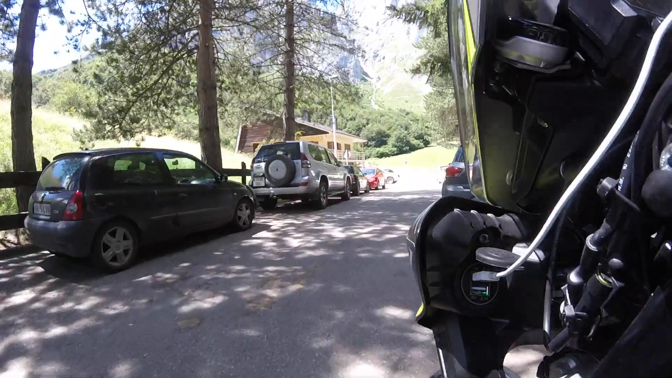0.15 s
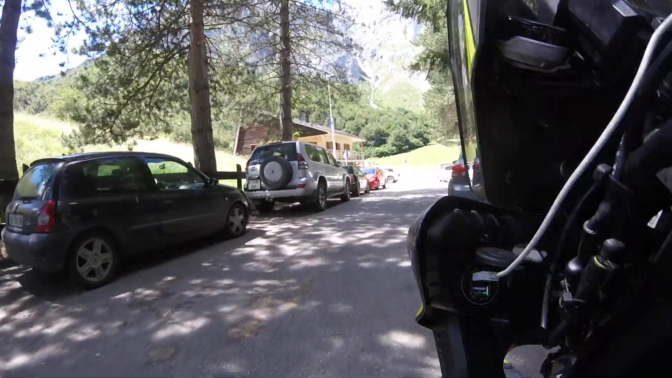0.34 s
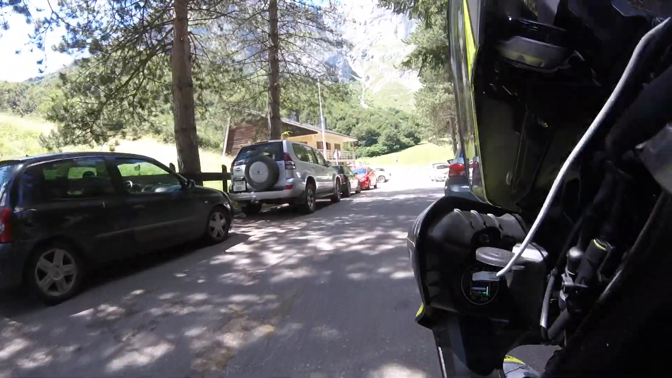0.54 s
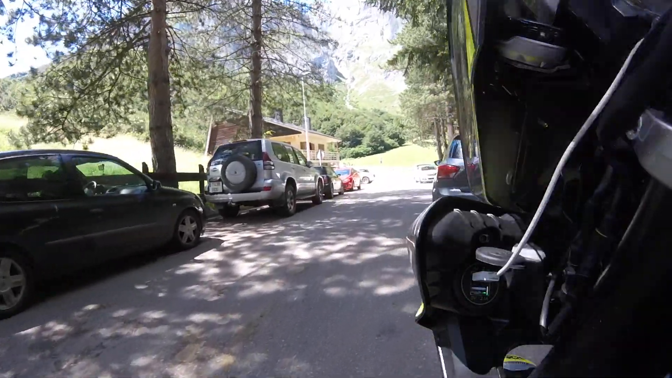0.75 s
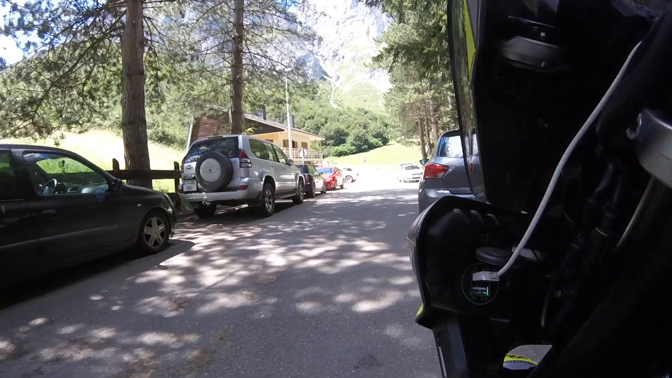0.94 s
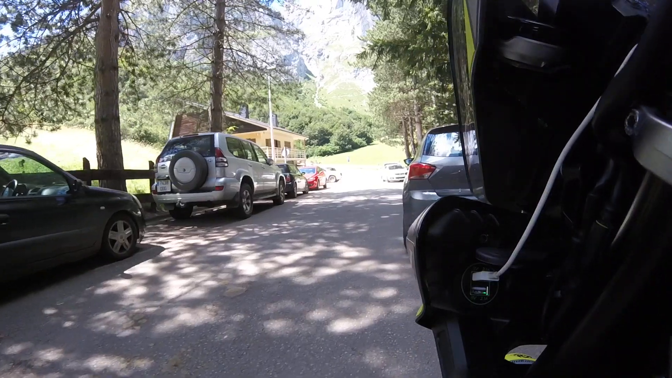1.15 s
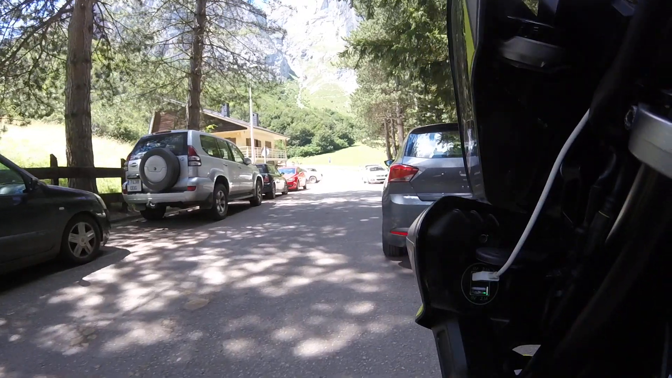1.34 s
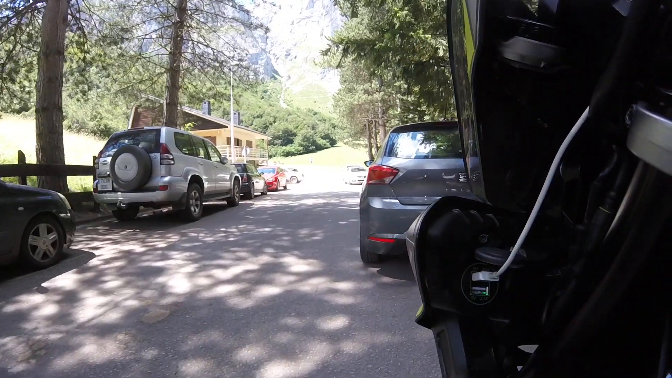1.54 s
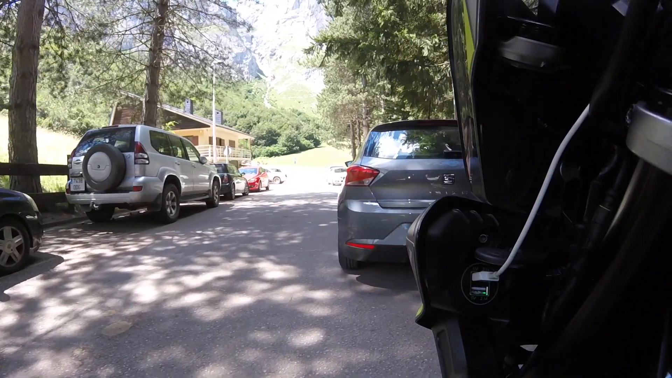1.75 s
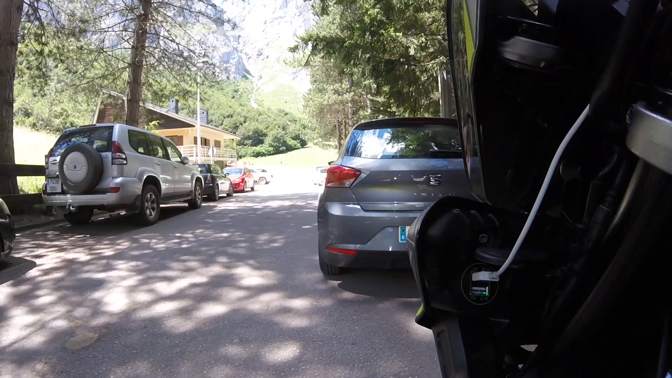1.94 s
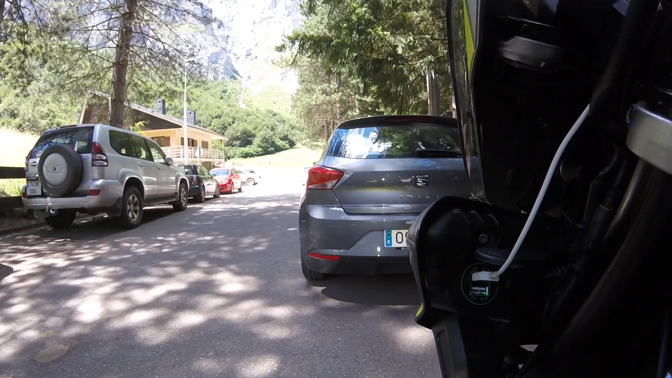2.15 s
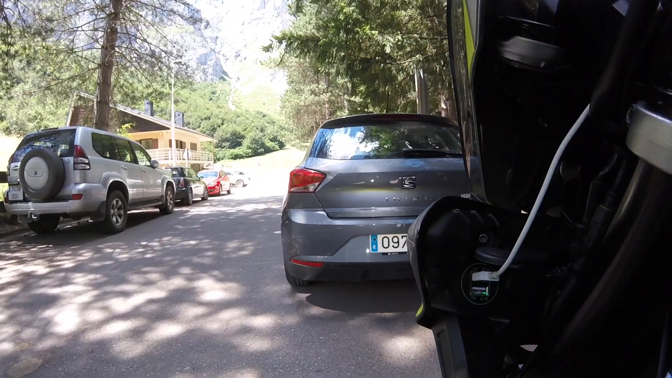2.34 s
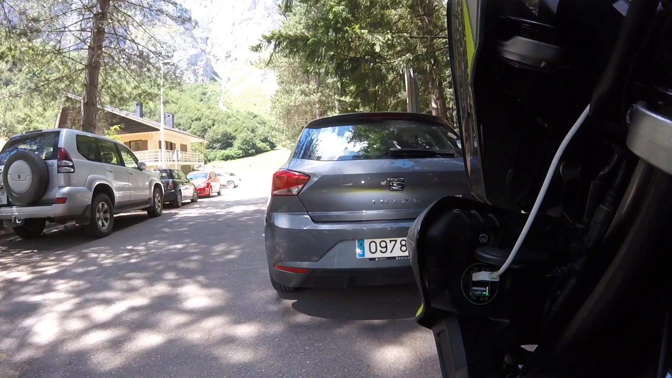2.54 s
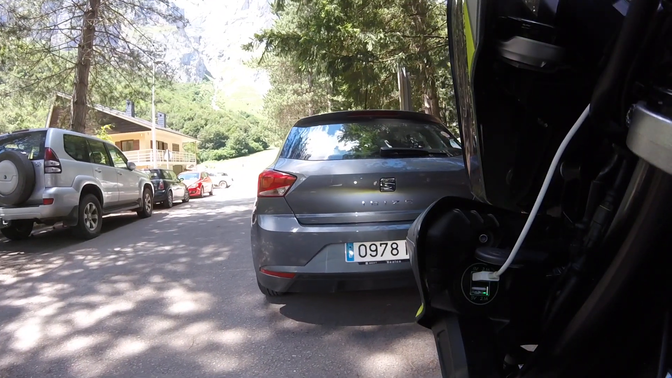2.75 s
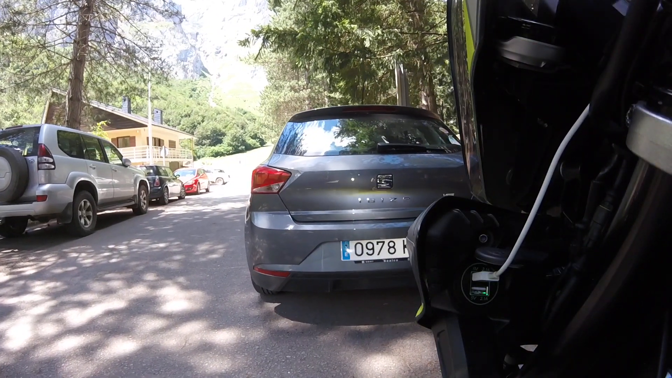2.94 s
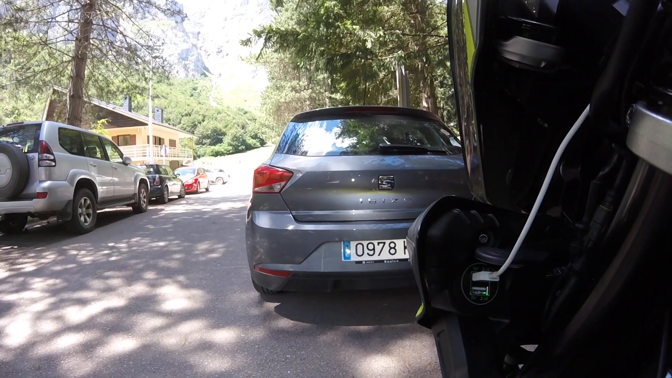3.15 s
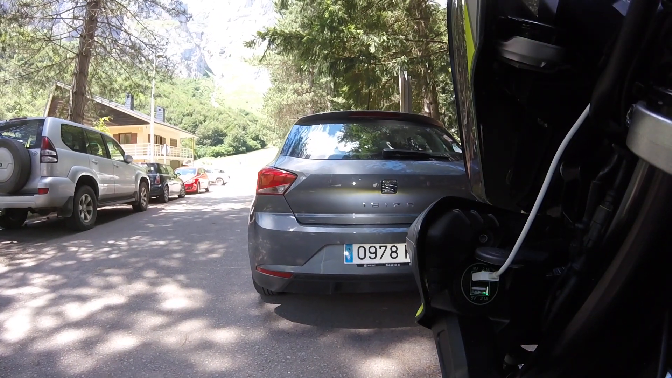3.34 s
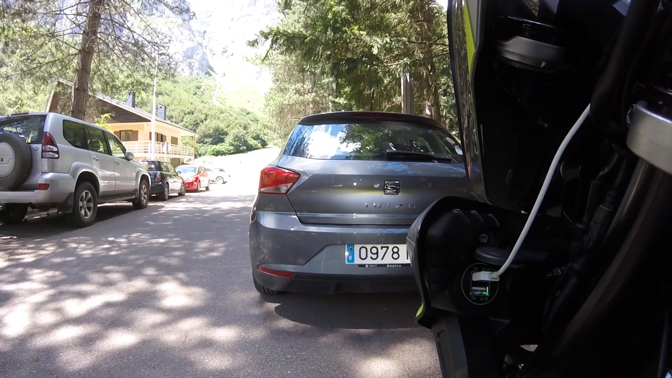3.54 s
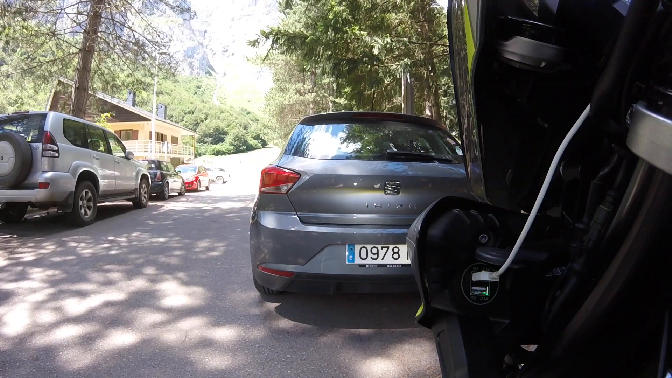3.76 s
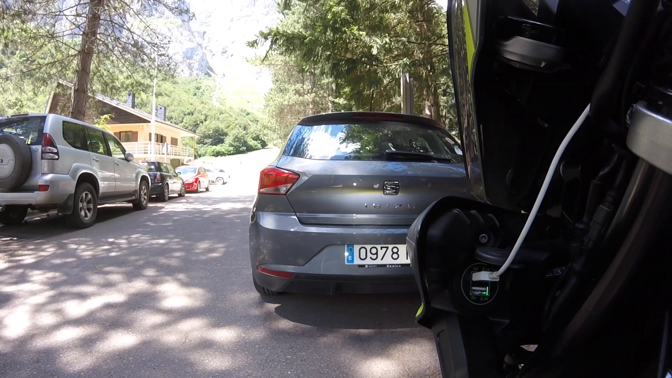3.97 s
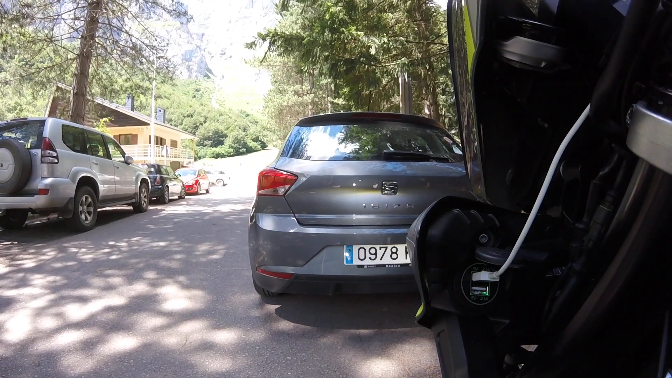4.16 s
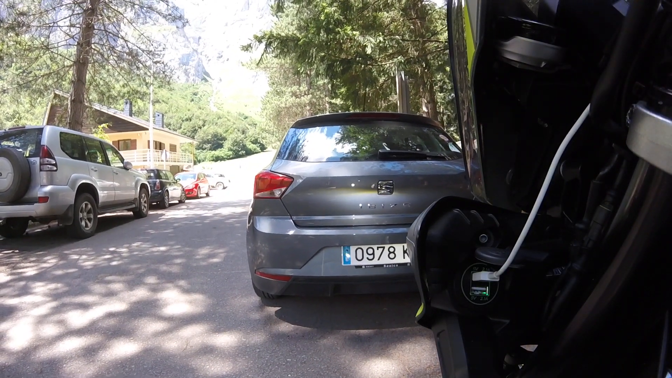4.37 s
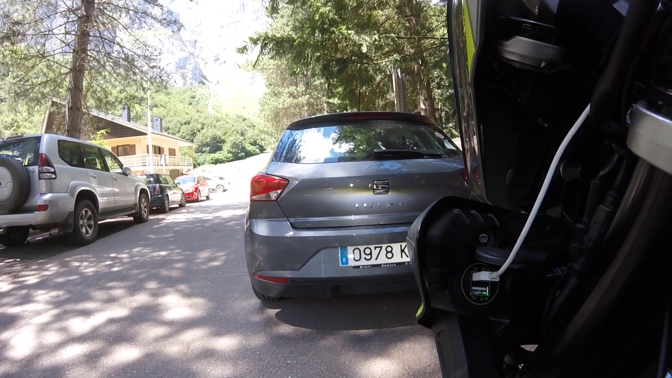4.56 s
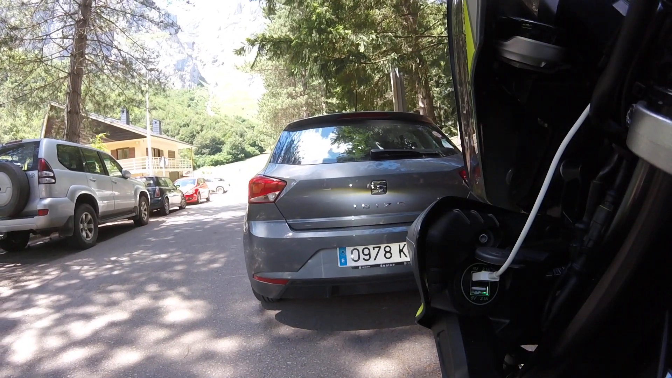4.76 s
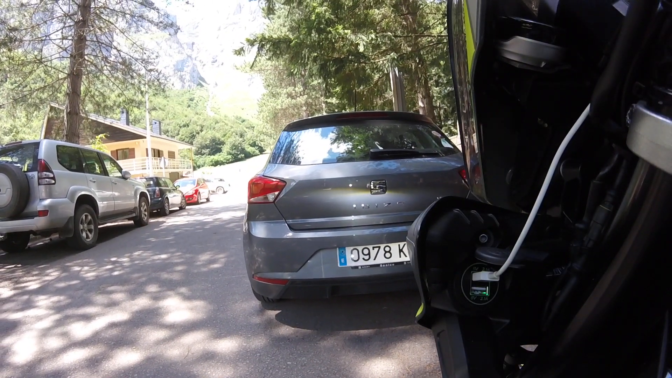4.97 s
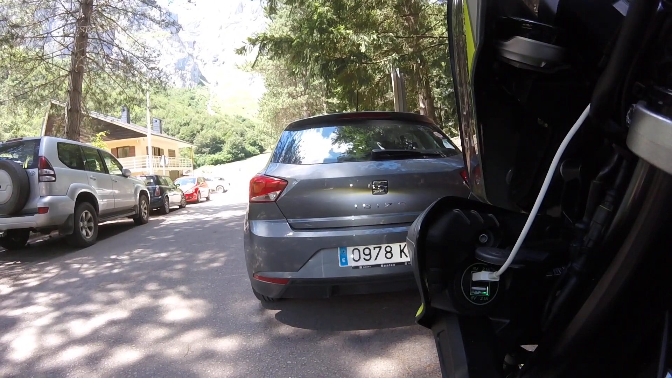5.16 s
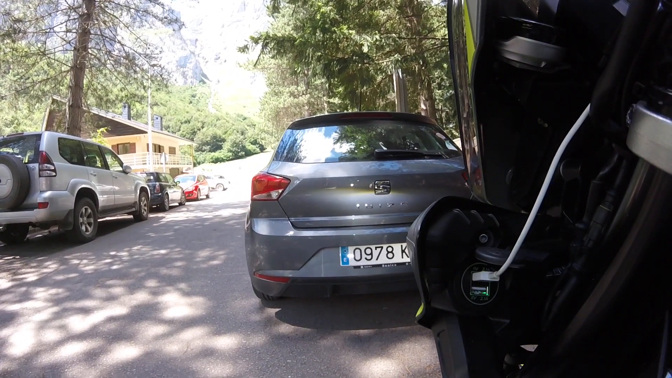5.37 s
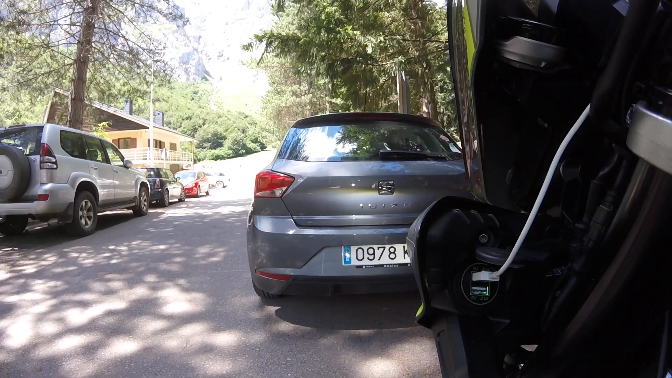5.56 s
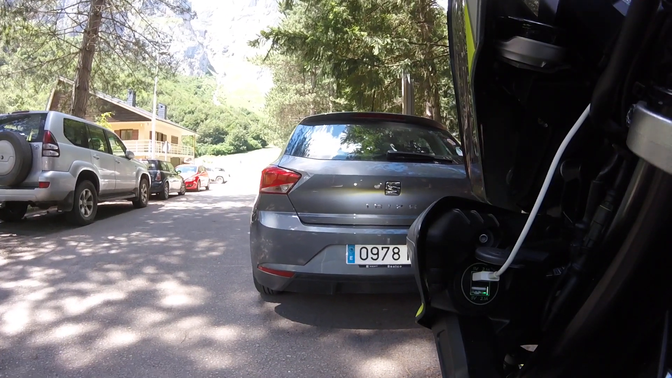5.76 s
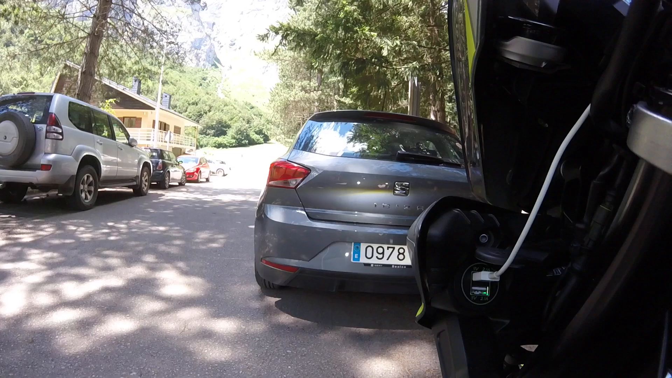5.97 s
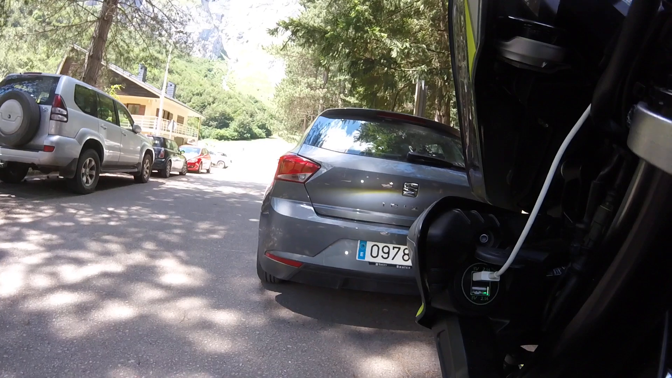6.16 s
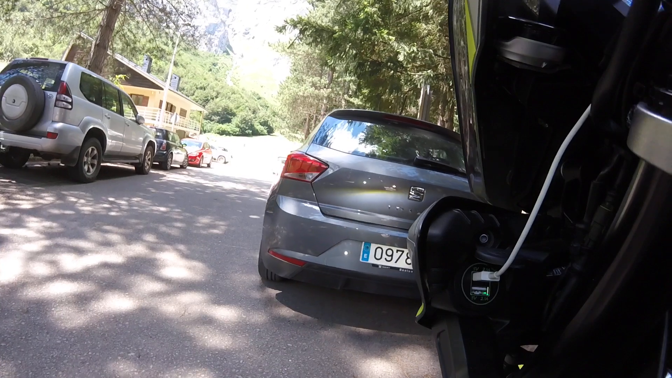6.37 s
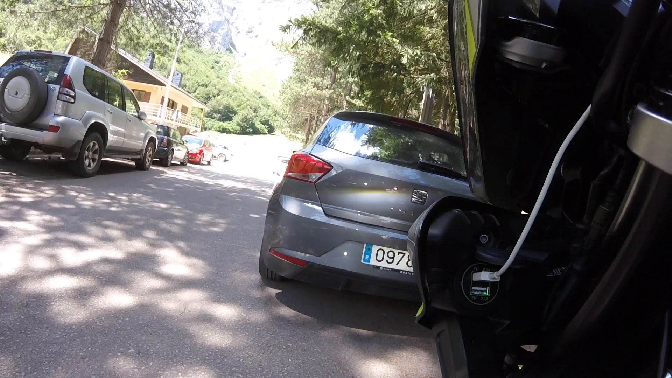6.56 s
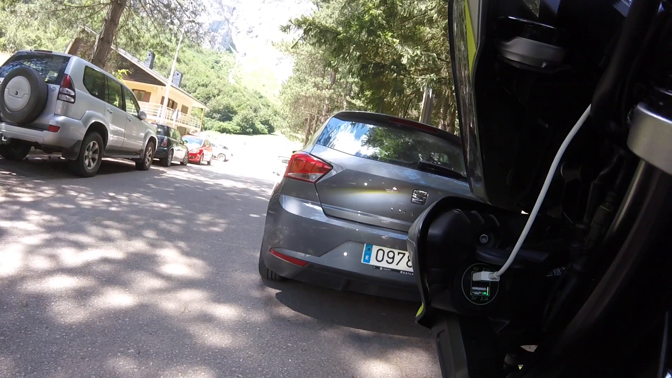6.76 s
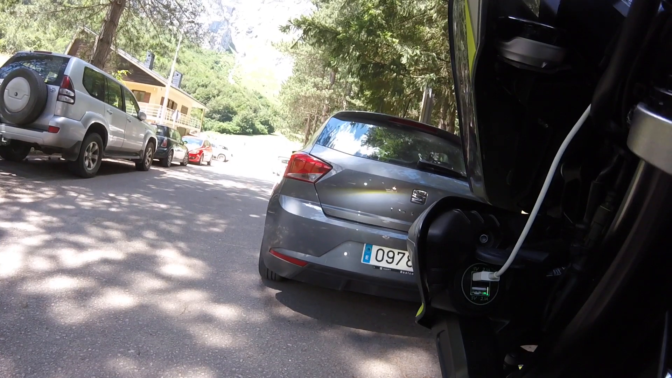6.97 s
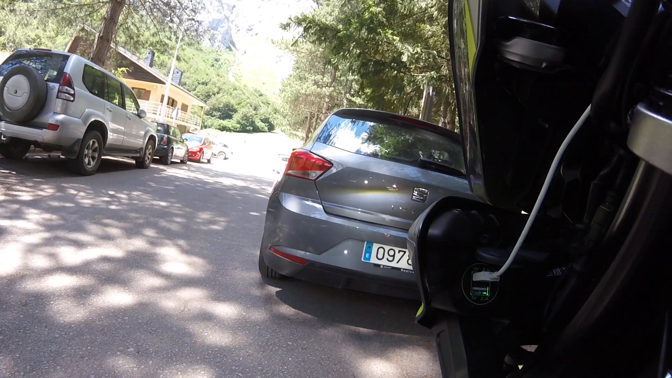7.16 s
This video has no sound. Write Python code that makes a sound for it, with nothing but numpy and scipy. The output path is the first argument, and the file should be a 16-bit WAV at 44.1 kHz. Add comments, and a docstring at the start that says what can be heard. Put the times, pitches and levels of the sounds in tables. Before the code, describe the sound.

A twin-cylinder motorcycle coasts over a rough lane, heard close up from the bike itself. Deep road and wind rumble comes first, with light tyre hiss, chain clatter, knocks and one sharp clack of a stone. The rumble fades as the bike slows to a crawl, leaving the engine idling in an uneven double beat. The brake groans faintly, and dull thumps and small clinks come from the jostled bike.

```python
"""A deep rumble and boom come first: road and air shake a twin-cylinder motorcycle on a rough lane.
It coasts at idle, and rumble, tyre hiss and chain clatter fade as it slows to a crawl.
Firing pulses excite the resonances of pipe and silencer in an uneven double beat throughout.
Friction makes the brake chirp once, then groan faintly. Impacts on the jostled bike ring its
damped modes as taps, knocks, clinks, the clack of a stone and dull thumps; dry parts scrape."""
import sys
import numpy as np
from scipy import signal
from scipy.fft import rfft, irfft, next_fast_len
from scipy.io import wavfile
from scipy.ndimage import uniform_filter1d

SR = 44100
rng = np.random.default_rng(int(sys.argv[2]) if len(sys.argv) > 2 else 0)


def store_pcm(level_fs):
    """Save levels as 16-bit WAV."""
    pcm = np.round(np.clip(level_fs, -1, 1) * 32767).astype(np.int16)
    wavfile.write(sys.argv[1], SR, np.atleast_2d(pcm).T)


N = 317961
TIME = np.arange(N) / SR


def gain_of(db):
    return 10 ** (np.asarray(db) / 20)

def unit_rms(x):
    return x / np.sqrt(np.mean(x ** 2) + 1e-20)

def curve(rows, column=1):
    """Linear interpolation of one column over time."""
    rows = np.array(rows)
    return np.interp(TIME, rows[:, 0], rows[:, column])

def add(mix, start_s, sound):
    part = mix[max(round(start_s * SR), 0):][:len(sound)]
    part += sound[:len(part)]

def coloured(x, spectrum):
    """Spectral shaping by a curve of relative levels; rms 1."""
    size = next_fast_len(N)
    hz, db = np.transpose(spectrum)
    shape_db = np.interp(np.log(np.fft.rfftfreq(size, 1 / SR) + 1), np.log(hz), db)
    return unit_rms(irfft(rfft(x, size) * gain_of(shape_db), size)[:N])

def noise(spectrum):
    return coloured(rng.standard_normal(N), spectrum)

def wander(per_s):
    """Random drift for modulation; rms 1."""
    knots = np.arange(0, 8, 1 / per_s)
    return unit_rms(np.interp(TIME, knots, rng.standard_normal(len(knots))))

def steadied(x, span_s):
    """Division by the running envelope evens out chance swells; rms 1."""
    power = uniform_filter1d(x ** 2, max(int(span_s * SR), 8))
    return unit_rms(x / np.sqrt(abs(uniform_filter1d(power, SR // 200)) + 1e-4))

def swells(rows, skew=0.56):
    """An envelope of one arch per event; a skew under 1 brings the peak early."""
    return sum(gain_of(db) * np.sin(np.pi * np.clip((TIME - start) / length, 0, 1) ** skew)
               for start, db, length in rows)

def tone(hz):
    """Phase is the integral of frequency; rms 1."""
    return np.sqrt(2) * np.sin(2 * np.pi * np.cumsum(hz) / SR)

def softened(x):
    """Low-pass: softens the highest treble of the tyre hiss and the impacts."""
    return signal.sosfilt(signal.butter(6, 7500, fs=SR, output="sos"), x)

# the bike coasts, brakes and creeps: time_s, relative_speed
ROAD_SPEED = [(0, 0.87), (.7, 0.78), (1.35, 0.81), (1.9, 0.47), (2.6, 0.21), (3.7, 0.22), (4.2, 0.14),
              (5.3, 0.32), (5.6, .06), (7.2, 0.13)]
def with_speed(db, power):
    """Power law: rolling noise grows with road speed, reaching db at a relative speed of 1."""
    return gain_of(db) * curve(ROAD_SPEED) ** power

# bumps in the lane: start_s, level_db, length_s
LANE_BUMPS = [(-.03, -8.5, 0.049), (.04, -19.5, 0.067), (.09, -22.5, 0.047), (.175, -16.5, 0.11),
              (.295, -14, 0.046), (.355, -16, 0.085), (.432, -16.5, .1), (.54, -18, 0.1),
              (.655, -18.5, 0.041), (.715, -16, 0.13), (.855, -20, .055), (.915, -23, 0.12),
              (1.165, -28, 0.091), (1.22, -15.5, 0.056), (1.278, -15, 0.051), (1.355, -18.5, 0.093),
              (1.455, -27, 0.14), (1.655, -25.5, 0.026), (1.703, -22.5, 0.053), (1.79, -34.5, 0.13),
              (2.06, -29, 0.12), (2.22, -31, .1), (3.27, -31.5, .15)]
# spectrum of the shaken bodywork: frequency_hz, density_db
RUMBLE_SPECTRUM = [(10, -40), (20, -5.5), (28, 9.5), (38, 1.5), (48, -1), (60, 0.5), (74, -3.5), (100, -10),
                   (150, -27.5), (250, -46), (500, -85.5)]
def bodywork():
    """Forced vibration: road and air drive a broad rumble and one low, drifting resonance."""
    bumps = swells(LANE_BUMPS, skew=.95)
    boom_hz = 58 * (1 + .08 * wander(30))
    boom = tone(boom_hz) * np.hypot(bumps, with_speed(-26, power=2.6))
    rumble = steadied(noise(RUMBLE_SPECTRUM), span_s=.2)
    rumble *= np.hypot(with_speed(-23, power=1.32), gain_of(-8) * bumps)
    return signal.sosfilt(signal.butter(4, 100, fs=SR, output="sos"), boom) + rumble

# spectrum of tyre hiss: frequency_hz, density_db
TYRE_SPECTRUM = [(400, -0.5), (520, -2), (800, -7), (1100, 0), (1350, -7.5), (1600, -3.5), (2100, -7.5),
                 (2450, -6), (2950, -4), (3600, -9.5), (4300, -9.5), (5200, -22.5), (6200, -14),
                 (8000, -31.5)]
def tyres():
    """Rolling contact: continuous hiss plus random impulses from crunched grit."""
    grit = (rng.random(N) < 220 / SR) * rng.choice([-1, 1], N)
    grit = grit * gain_of(4.5 * rng.exponential(1, N).clip(0, 3))
    hiss = coloured(rng.standard_normal(N) + .5 * unit_rms(grit), TYRE_SPECTRUM)
    return softened(hiss * with_speed(-55.5, power=1.62) * gain_of(wander(30.15)))

# spectrum of chassis judder: frequency_hz, density_db
JUDDER_SPECTRUM = [(60, -11), (130, 14.5), (210, 4.5), (290, 4), (380, -8.5), (500, -2), (640, -15.5),
                   (850, -35), (1600, -62)]
# the brake bites: start_s, level_db, length_s
BRAKE_BITES = [(1.27, -38, 0.72), (2.0, -65, .2), (2.2, -46.5, 0.64)]
def judder():
    """Incoherent excitations add in power: road and brake both shake the chassis."""
    drive = np.hypot(with_speed(-45.5, power=.82), swells(BRAKE_BITES))
    return steadied(noise(JUDDER_SPECTRUM), span_s=.016) * drive * gain_of(2 * wander(45))

def cycle_impulses(cycles, lag, uneven_db, jitter_s=.00012):
    """A quasi-periodic train: one impulse per four-stroke cycle, scattered in strength and time."""
    due_s = np.interp(np.arange(1, int(cycles[-1] - lag) + 1) + lag, cycles, TIME)
    size, slip = rng.standard_normal((len(due_s), 2)).T
    samples = ((due_s + jitter_s * slip) * SR).astype(int)
    train = np.zeros(N)
    train[np.clip(samples, 0, N - 1)] = gain_of(uneven_db * size)
    return train

def duct(firings, resonances):
    """Convolution: each gradual valve opening rings the damped resonances of a duct; rms 1."""
    t = TIME[:SR // 4]
    ring = sum((-1) ** k * gain_of(db) * np.exp(-np.pi * width * t) * np.sin(2 * np.pi * hz * t)
               for k, (hz, width, db) in enumerate(resonances))
    opening = t ** 2 * np.exp(-t / .00066)
    return unit_rms(signal.oaconvolve(firings, signal.fftconvolve(ring, opening))[:N])

# resonances of pipe and silencer: pitch_hz, bandwidth_hz, relative_db
PIPE_MODES = [(90.7, 11, -9), (150.5, 21.1, 3), (60.9, 9, -17)]
SILENCER_MODES = [(253.6, 20, -3), (318, 33, -5.5), (344, 7, 2), (376.7, 10, 3), (435, 23, -1)]
# exhaust strength: time_s, gain_db
EXHAUST_GAIN = [(0, -44), (1.2, -42), (2.7, -40), (4.1, -37), (6.1, -37.5), (6.6, -38.5), (7.2, -40)]
def exhaust(first, second, rasp):
    """Duct resonance: firings beat in the pipe and chug in the silencer, beside the rasp of gas."""
    beat = duct(gain_of(-2.5) * first + second, PIPE_MODES)
    chug = duct(first + gain_of(-.5) * second, SILENCER_MODES)
    gas = gain_of(-17.5 + 2 * wander(13)) * rasp
    return gain_of(curve(EXHAUST_GAIN)) * (gain_of(1) * beat + gain_of(-23.5) * chug + gas)

# ticks of the valve gear: cycle_share, dull_db, bright_db
VALVE_TICKS = [(.04, -60.5, -68.5), (.22, -62, -64), (.42, -61.5, -68), (.58, -76, -69), (.78, -62.5, -67),
               (.85, -63.5, -73)]
# spectra of a tick's two parts: frequency_hz, density_db
DULL_SPECTRUM = [(700, -24), (1100, -2.5), (1290, 3), (1500, -13), (2000, -14.5), (5000, -47)]
BRIGHT_SPECTRUM = [(1500, -19), (2100, -9.5), (2550, 0.5), (2850, -3.5), (3250, -1.5), (3800, -12.5),
                   (6000, -22.5), (9000, -33.5)]
def valves(cycles):
    """Periodic impact: each valve tick is a decaying burst of noise, once a cycle."""
    fade = np.exp(-TIME[:SR // 20] / .0045)
    dull, bright = np.zeros((2, N))
    for lag, dull_db, bright_db in VALVE_TICKS:
        tick = signal.oaconvolve(cycle_impulses(cycles, lag, uneven_db=1), fade)[:N]
        dull += gain_of(dull_db) * tick
        bright += gain_of(bright_db) * tick
    return dull * noise(DULL_SPECTRUM) + bright * noise(BRIGHT_SPECTRUM)

# the gently hunting idle: time_s, crank_rpm
IDLE_RPM = [(0.0, 1577), (0.7, 1489), (2.2, 1528), (2.4, 1487), (4.1, 1535), (4.5, 1466), (5.2, 1547),
            (5.45, 1456), (6.05, 1546), (7.2, 1477)]
# spectra of rasping gas, whirring gears and trembling frame: frequency_hz, density_db
RASP_SPECTRUM = [(150, -38.5), (240, -4), (300, -5), (378, 1.5), (410, 2), (460, -2.5), (540, -21),
                 (800, -28), (1500, -67.5)]
WHIRR_SPECTRUM = [(200, -1), (600, 2), (1100, -1), (1290, 3), (1500, -2.5), (2200, -4.5), (2550, -4.5),
                  (2850, -3), (3200, 1), (3700, -8.5), (6000, -14.5), (9000, -22), (11900, -28.5),
                  (13200, -44), (15500, -54.5)]
SHAKE_SPECTRUM = [(8, -14), (14, -4), (25, -6), (45, -1), (62, -2), (85, -7), (160, -7.5), (200, -19.5),
                  (300, -27.5), (900, -77)]
def engine():
    """Periodic forcing: two cylinders fire in a limping pair, gears whirr, the crank shakes the frame."""
    cycles = np.cumsum(curve(IDLE_RPM)) / (120 * SR)  # two crank turns per cycle
    first = cycle_impulses(cycles, lag=-.025, uneven_db=1)
    second = cycle_impulses(cycles, lag=.367, uneven_db=.7)
    t = TIME[:SR // 4]
    puff = (1 - np.exp(-t / .0015)) * np.exp(-(t / .028) ** 3)
    gas_first, gas_second = (signal.oaconvolve(train, puff)[:N] for train in (first, second))
    rasp = unit_rms(steadied(noise(RASP_SPECTRUM), span_s=.015) * (.22 + gas_first + .2 * gas_second))
    pulsing = 1 + .22 * gas_second + .1 * gas_first
    whirr = gain_of(-59.5) * unit_rms(noise(WHIRR_SPECTRUM) * pulsing * gain_of(.6 * wander(90)))
    tailpipe = exhaust(first, second, rasp)
    shake = gain_of(-40) * noise(SHAKE_SPECTRUM)
    crank = gain_of(-53) * np.sin(4 * np.pi * cycles)
    return tailpipe + shake + crank + whirr + valves(cycles)

def clatter(modes, ticks_per_s=90, spread_db=3):
    """Poisson excitation: each mode is rung by its own stream of ticks; rms 1."""
    t, out = TIME[:SR // 20], np.zeros(N)
    for hz, db, t60 in modes:
        ticks = (rng.random(N) < ticks_per_s / SR) * gain_of(spread_db * rng.standard_normal(N))
        ring = gain_of(db - 60 * t / t60) * t * np.sin(2 * np.pi * hz * t)
        out += signal.oaconvolve(ticks, ring)[:N]
    return unit_rms(out)

# modes of the chain and its guard: pitch_hz, relative_db, t60_s
CHAIN_LOW_MODES = [(1220, -4, 0.015), (1307, 0, .016), (1470, 0, .011)]
CHAIN_HIGH_MODES = [(2530, -2.3, .018), (2803, 0.26, 0.013), (3242, -1.2, 0.015)]
# strength of the clatter: time_s, low_modes_db, high_modes_db
CHAIN_LEVELS = [(0, -71, -70.5), (.35, -63, -60.5), (.6, -66.5, -67.5), (1.0, -59.5, -68),
                (1.3, -56.5, -60), (1.45, -65.5, -70), (2, -69, -71), (3.6, -71, -89), (4, -100, -100)]
def chain():
    """Random impacts: links tick against the sprockets and the guard."""
    low = gain_of(curve(CHAIN_LEVELS)) * clatter(CHAIN_LOW_MODES)
    high = gain_of(curve(CHAIN_LEVELS, column=2)) * clatter(CHAIN_HIGH_MODES)
    return low + high

def strike(modes, tilt_db, scatter, grit, grit_s, soft_s=0):
    """Modal response: a crunch of contact rings damped modes, a little different each blow; peak 1."""
    t = TIME[:SR // 5]
    hz, db, t60 = np.transpose(modes)[:, :, None]
    detune, weight, side = rng.standard_normal((3, len(modes), 1))
    level = gain_of(db + 2 * weight + tilt_db * np.log2(hz / hz.mean()) - 60 * t / t60)
    ring = (np.sign(side) * level * np.sin(2 * np.pi * hz * (1 + scatter * detune) * t)).sum(0)
    contact = grit * rng.standard_normal(len(t)) * np.exp(-t / grit_s)
    contact[0] = 1
    onset = 1 - np.exp(-t / (soft_s + 1e-9))
    blow = softened(signal.fftconvolve(ring, contact)[:len(t)] * onset)
    return blow / abs(blow).max()

# modes of the plastic panels: pitch_hz, relative_db, t60_s
PANEL_MODES = [(950, -6, .012), (1260, -2, .016), (1620, -4, .008), (1950, 0, .009), (2500, -6, .01),
               (2900, -9, .008), (3400, -15, .008), (4400, -22, .008)]
# taps on them: start_s, peak_db, tilt_db_per_octave, scuff_s
PANEL_TAPS = [(0.346, -43, -13, .004), (0.557, -44.5, 11, 0.0028), (.721, -51, 4, 0.0017),
              (0.994, -38, -12, 0.0046), (1.058, -39, 6, 0.0044), (1.675, -48, 1, 0.0022),
              (3.764, -47, -17, 0.015), (5.093, -40, -17, 0.013), (6.235, -53, -3.5, .008),
              (6.26, -39.5, 6, 0.0032), (6.427, -33.5, 1, 0.00084)]
def panel_taps(mix):
    """Heavy damping: light panels answer a blow with a dry tap."""
    for start, db, tilt, scuff in PANEL_TAPS:
        add(mix, start, gain_of(db) * strike(PANEL_MODES, tilt, scatter=.012, grit=.26, grit_s=scuff))

# modes of the chassis: pitch_hz, relative_db, t60_s
CHASSIS_MODES = [(197, 7.5, .046), (262, 1.5, 0.034), (306, -1, 0.065), (468, -3.5, .036),
                 (540, -3.5, 0.046), (626, -6, 0.033), (774, -23.5, 0.024), (1290, -25.5, 0.016)]
# knocks of heavy parts: start_s, peak_db, tilt_db_per_octave
CHASSIS_KNOCKS = [(0.501, -30.5, -5), (0.558, -28, -3.5), (0.721, -32.5, 5), (1.086, -26.5, 0.5),
                  (1.373, -34.5, 7.5), (1.554, -23, -4), (1.763, -26.5, -5), (1.924, -24, -4),
                  (2.132, -24.5, -7), (2.181, -27, -12), (2.222, -31.5, -12), (2.251, -28.5, -13),
                  (2.331, -30, -14), (3.714, -25, -20), (3.762, -32.5, 0), (4.483, -36.5, 1),
                  (5.087, -28, -10), (6.233, -28.5, 4), (6.426, -31, 3)]
def chassis_knocks(mix):
    """Cushioned impact: rubber mounts soften the onset of the chassis's low modes."""
    for start, db, tilt in CHASSIS_KNOCKS:
        knock = strike(CHASSIS_MODES, tilt, scatter=.032, grit=.035, grit_s=.0026, soft_s=.0006)
        add(mix, start, gain_of(db) * knock)

# modes of a lever: pitch_hz, relative_db, t60_s
LEVER_MODES = [(820, -9, .01), (1140, -3, .012), (1370, -4, .012), (1660, -5, .01), (2050, -8, .008),
               (2515, 0, .018), (2800, -4, .01), (3200, -10, .01), (4450, -18, .012), (5400, -27, .012)]
# blows on the levers: start_s, peak_db, tilt_db_per_octave, scuff_s
LEVER_CLINKS = [(0.898, -41, 2, 0.0033), (1.544, -45, -1, .002), (1.574, -44, -2, .002),
                (3.683, -47, 5, 0.02), (3.713, -50, -7, 0.0088), (4.12, -50.5, 4, .009),
                (4.32, -48, -6, 0.0073), (4.478, -35, -4, 0.01), (4.947, -41.5, -6, 0.0053),
                (5.081, -35.5, -1, .005), (6.213, -41, -4, .03), (6.361, -46, -2, 0.0027)]
def lever_clinks(mix):
    """Hard contact excites the high modes of metal levers."""
    for start, db, tilt, scuff in LEVER_CLINKS:
        add(mix, start, gain_of(db) * strike(LEVER_MODES, tilt, scatter=.0049, grit=.37, grit_s=scuff))

# course of the chirp: time_s, pitch_hz, level_db
BRAKE_CHIRP = [(.94, 11850, -92), (.957, 11790, -72), (.968, 11730, -68), (.98, 11730, -60),
               (.992, 11750, -73), (1.01, 11740, -78), (1.03, 11720, -96)]
def brake_chirp():
    """Friction-induced oscillation: the pad sings on the disc in a thin, unsteady tone."""
    pitch_hz = curve(BRAKE_CHIRP) + 55 * wander(400)
    touching = (TIME > BRAKE_CHIRP[0][0]) & (TIME < BRAKE_CHIRP[-1][0])
    return touching * gain_of(curve(BRAKE_CHIRP, column=2)) * tone(pitch_hz)

# modes of the fairing: pitch_hz, relative_db, t60_s
FAIRING_MODES = [(636, -10, .035), (780, -17, .012), (1013, -15, .035), (1237, -15, .04), (1360, -13, .045),
                 (1520, -15, .02), (1655, -12, .016), (2080, -1, .008), (2300, -1, .008), (2530, 1, .013),
                 (2790, -5, .012), (3100, -10, .009), (3580, -4.5, .016), (4420, -21, .012),
                 (4970, -17, .016), (5700, -17, .008), (5980, -16, .008), (6330, -18, .01)]
# a stone grazes, hits and bounces: start_s, peak_db, tilt_db_per_octave
STONE_HITS = [(1.5551, -31, 4), (1.5566, -20.5, -.5), (1.5646, -39, 0)]
def stone_clack(mix):
    """Temporal fusion: blows on the fairing milliseconds apart are heard as one clack."""
    for start, db, tilt in STONE_HITS:
        add(mix, start, gain_of(db) * strike(FAIRING_MODES, tilt, scatter=.004, grit=.07, grit_s=.002))

# groans as the bike creeps: start_s, level_db, length_s
BRAKE_GROANS = [(2.3, -61.5, 0.44), (4.07, -62.5, 0.2), (4.48, -65, 0.18), (4.85, -63, 0.3),
                (5.08, -57, .15)]
# their spectrum: frequency_hz, density_db
GROAN_SPECTRUM = [(450, -55), (570, -4), (620, 5), (680, -17), (850, -49)]
def brake_groans():
    """Slow sliding friction in the brake gives a narrow band of noise."""
    return noise(GROAN_SPECTRUM) * swells(BRAKE_GROANS)

def swing(hz, rise_s):
    """A damped oscillation whose envelope peaks at 1 after rise_s."""
    t = TIME[:SR // 2]
    return t / rise_s * np.exp(1 - t / rise_s) * np.cos(2 * np.pi * hz * t)

# soft shoves: start_s, level_db, pitch_hz, rise_s, overtone_db
SHOVES = [(3.053, -22, 56.7, 0.014, -32), (3.702, -26.5, 63, 0.017, -8), (4.618, -15.5, 77, 0.013, -22),
          (4.659, -27, 38.3, 0.051, -28), (4.78, -21.5, 66.6, 0.013, -26), (5.084, -9, 54.46, 0.028, -9.5),
          (5.089, -21, 129.4, 0.021, -32), (5.197, -28.5, 61.6, 0.064, -22),
          (6.212, -17.5, 100.2, 0.019, -28), (6.234, -11, 52.7, .03, -11.5), (6.363, -21, 55.2, 0.02, -27)]
def thumps(mix):
    """Free vibration: a shove swings the whole bike, with one inharmonic overtone of the frame."""
    for start, db, hz, rise, overtone_db in SHOVES:
        overtone = gain_of(overtone_db) * swing(1.79 * hz, rise / .86)
        add(mix, start, gain_of(db) * (swing(hz, rise) + overtone))

# rubs as the weight shifts: start_s, level_db, length_s
RUBS = [(3.185, -58, 0.039), (4.482, -54, .025), (3.675, -67, 0.062), (3.708, -53, 0.058),
        (3.758, -60, .03), (3.8, -65, 0.059), (5.078, -56, 0.032), (6.212, -58, .035), (6.365, -61, 0.067)]
# their spectrum: frequency_hz, density_db
RUB_SPECTRUM = [(600, -14), (950, 1), (1150, -3.5), (1400, 13.5), (1700, -9), (2100, -15.5), (2580, 2),
                (2900, -4.5), (3600, -20), (7000, -32.5)]
def scrapes():
    """Stick-slip friction: dry parts of the fork and levers rub in quick, uneven slips."""
    return unit_rms(noise(RUB_SPECTRUM) * gain_of(3 * wander(350))) * swells(RUBS)

# modes of the frame: pitch_hz, relative_db, t60_s
FRAME_MODES = [(181, -1.5, 0.093), (214.7, 0, 0.22), (294.3, -2, 0.16), (400.4, -3.5, 0.053),
               (509, -8, 0.078), (571, -22, 0.044), (970, -27.5, .04), (1425, -22, 0.046)]
# jolts to it: start_s, peak_db, shudder_s
FRAME_JOLTS = [(3.704, -27.5, 0.073), (5.095, -29.5, 0.037), (6.222, -37.5, 0.07)]
def frame_shudders(mix):
    """Prolonged excitation: loose parts shudder after a jolt and keep the frame ringing."""
    for start, db, length in FRAME_JOLTS:
        shudder = strike(FRAME_MODES, tilt_db=1.5, scatter=.0035, grit=.047, grit_s=length)
        add(mix, start, gain_of(db) * shudder)

def scene():
    """Superposition: all sources sum into one channel."""
    mix = engine() + bodywork() + tyres() + judder() + brake_groans() + chain()
    for add_impacts in (thumps, chassis_knocks, frame_shudders, lever_clinks, panel_taps, stone_clack):
        add_impacts(mix)
    return (mix + scrapes() + brake_chirp())[None]

def record(dry):
    """Band limiting: the deepest bass and the highest treble roll off."""
    dry = signal.sosfilt(signal.butter(1, 8, "highpass", fs=SR, output="sos"), dry)
    lowpass = signal.firwin(511, 15700, window=("kaiser", 9), fs=SR)
    return signal.oaconvolve(dry, lowpass[None], "same")


dry = scene()
out = record(dry)
store_pcm(out)
```